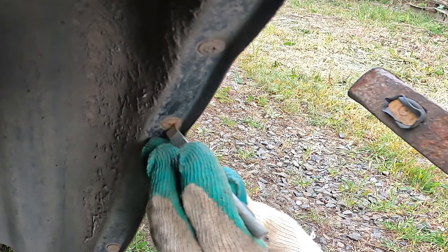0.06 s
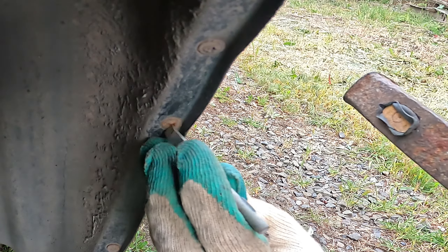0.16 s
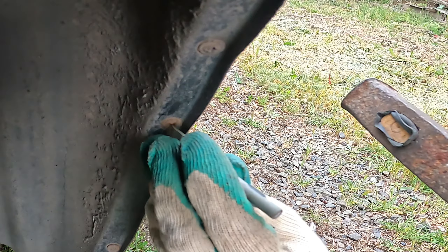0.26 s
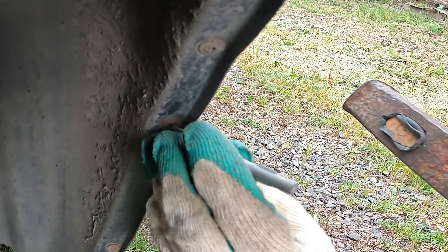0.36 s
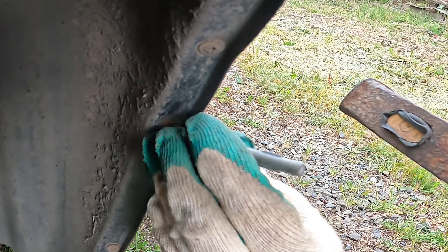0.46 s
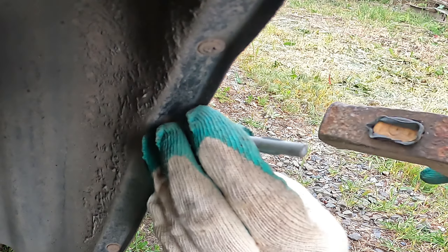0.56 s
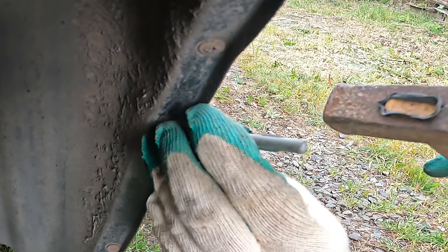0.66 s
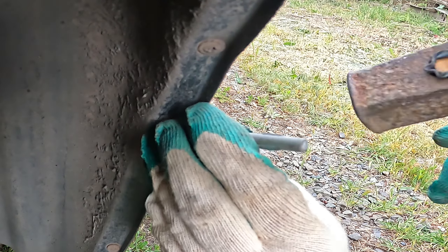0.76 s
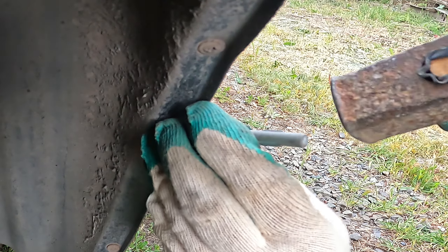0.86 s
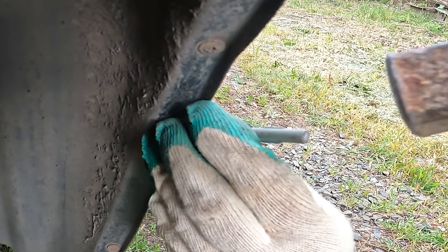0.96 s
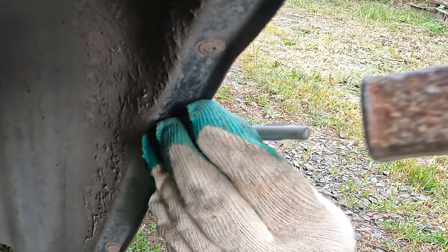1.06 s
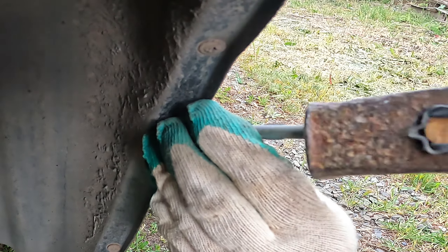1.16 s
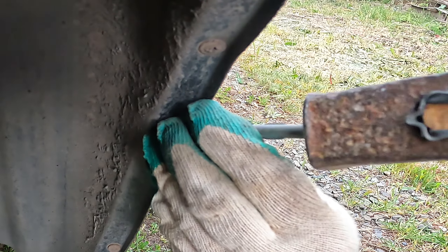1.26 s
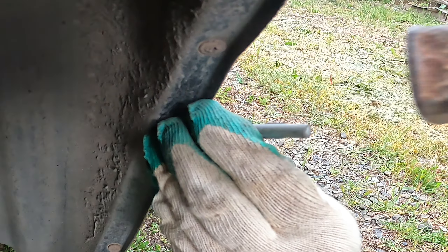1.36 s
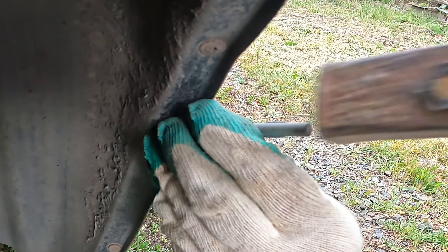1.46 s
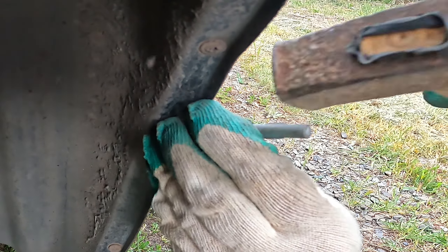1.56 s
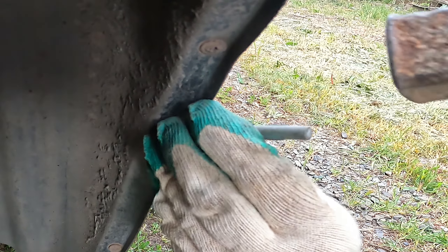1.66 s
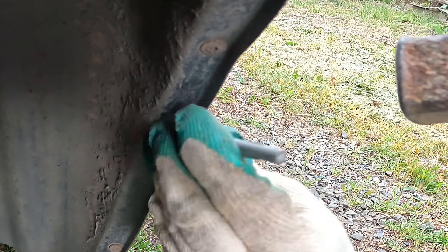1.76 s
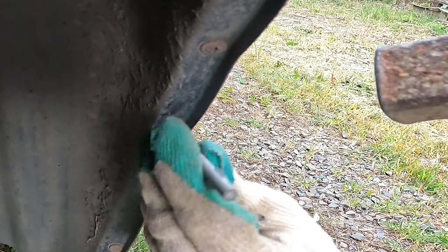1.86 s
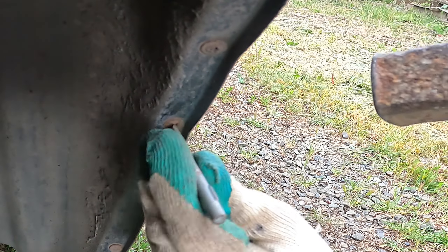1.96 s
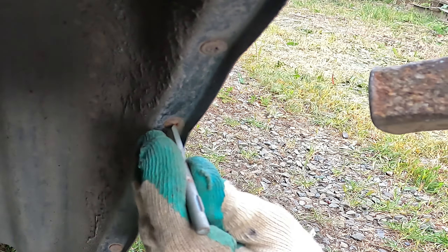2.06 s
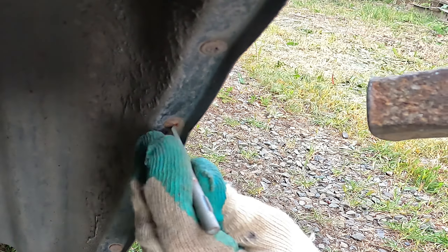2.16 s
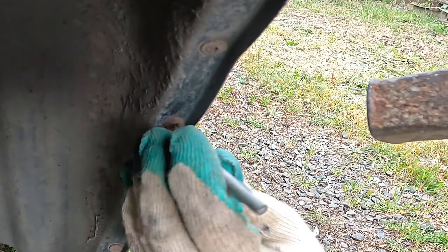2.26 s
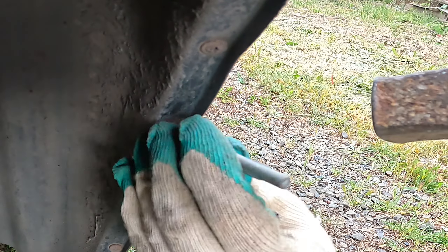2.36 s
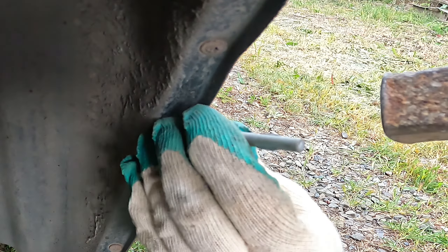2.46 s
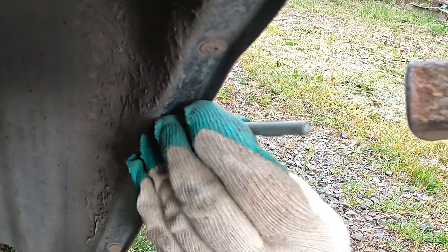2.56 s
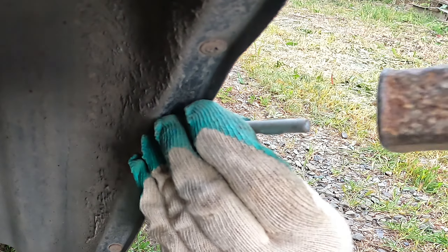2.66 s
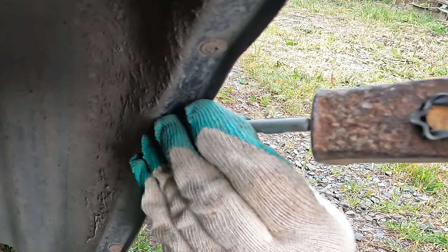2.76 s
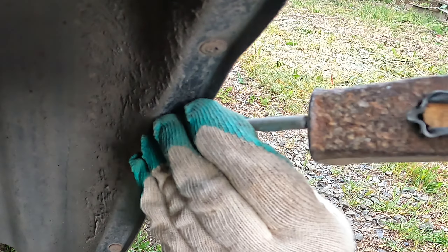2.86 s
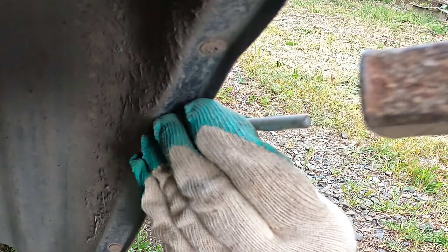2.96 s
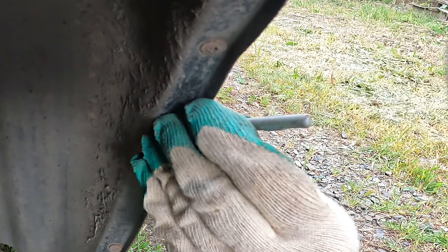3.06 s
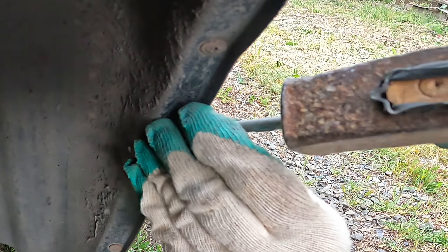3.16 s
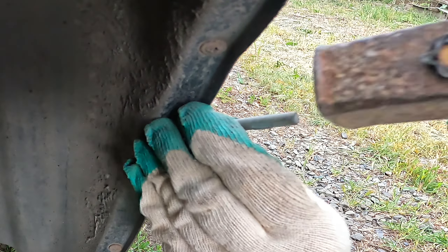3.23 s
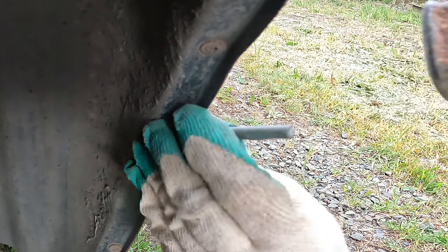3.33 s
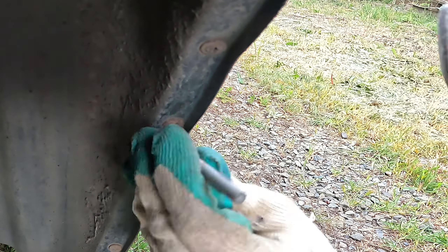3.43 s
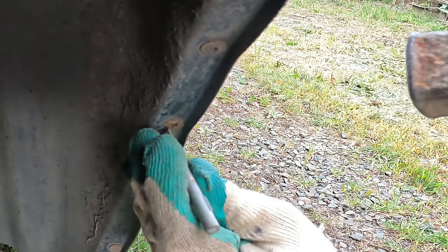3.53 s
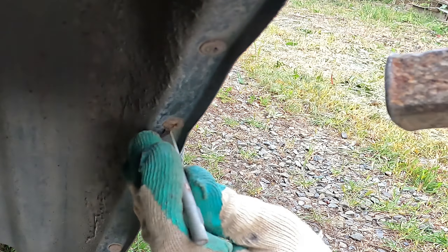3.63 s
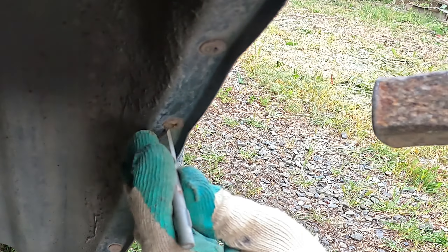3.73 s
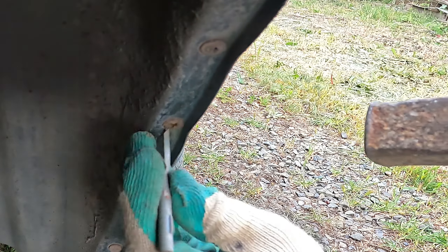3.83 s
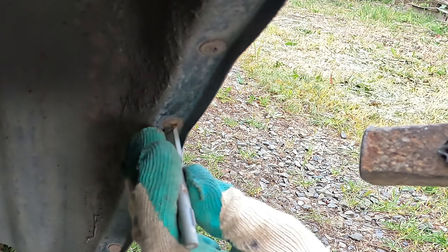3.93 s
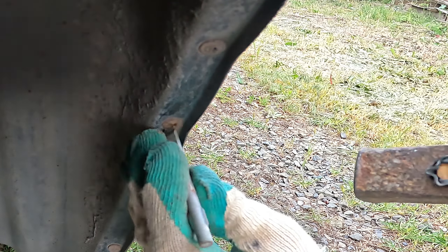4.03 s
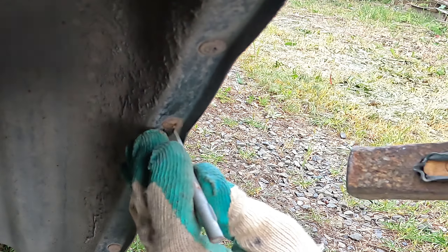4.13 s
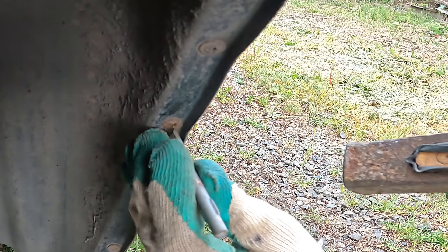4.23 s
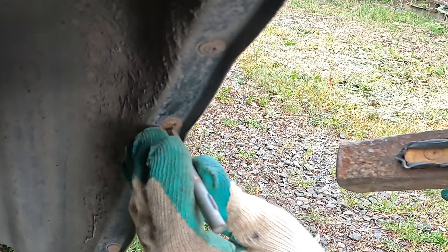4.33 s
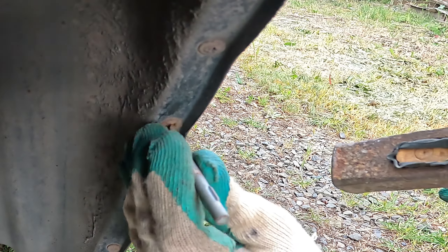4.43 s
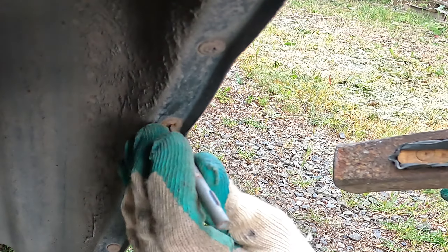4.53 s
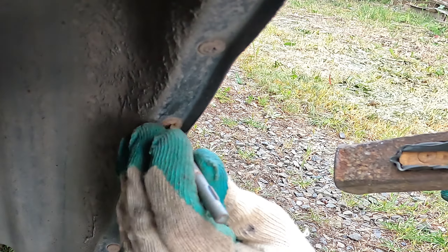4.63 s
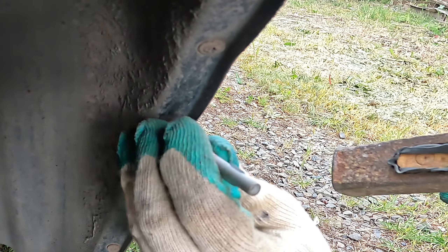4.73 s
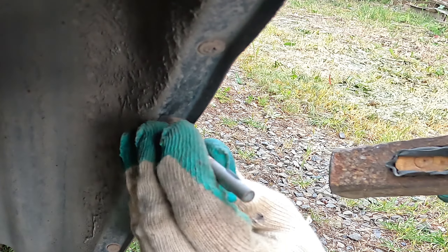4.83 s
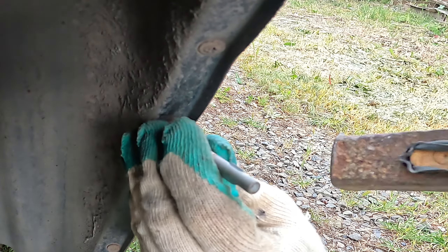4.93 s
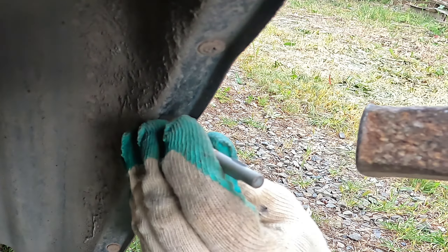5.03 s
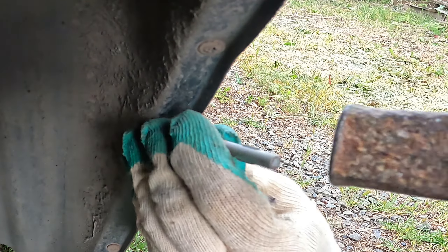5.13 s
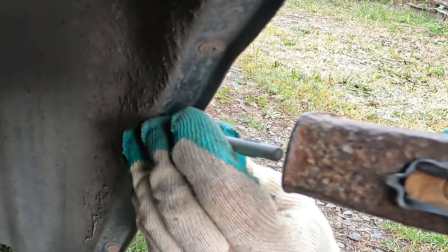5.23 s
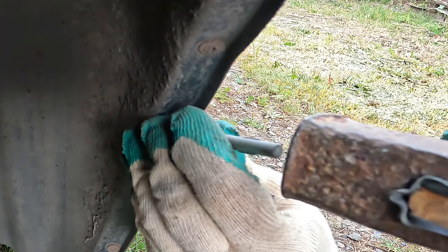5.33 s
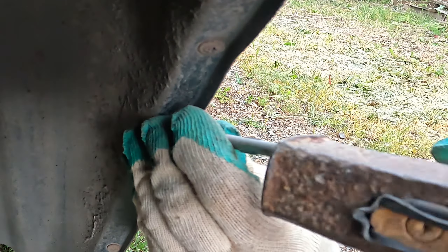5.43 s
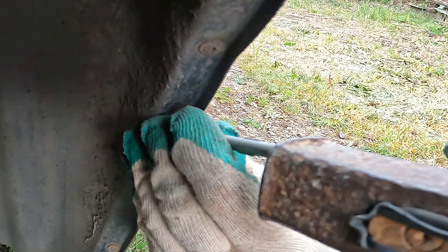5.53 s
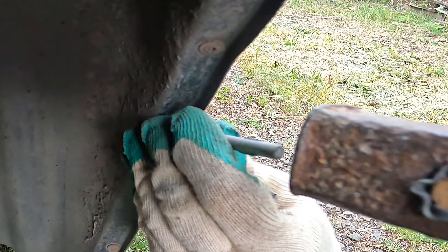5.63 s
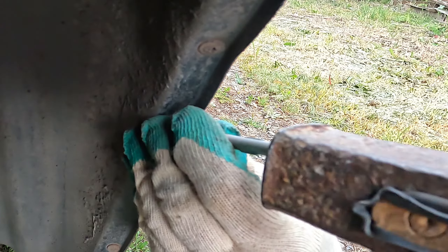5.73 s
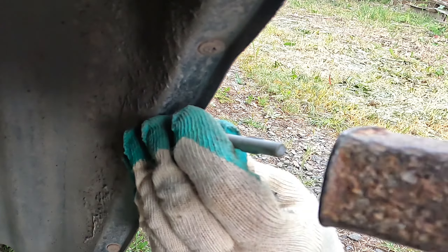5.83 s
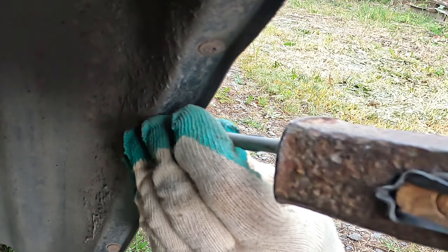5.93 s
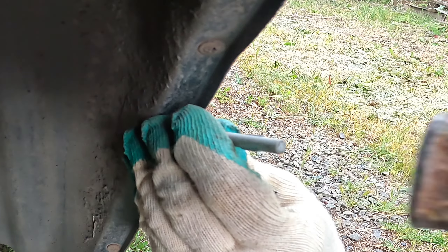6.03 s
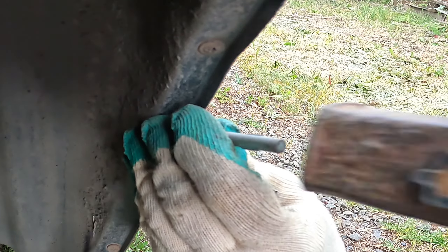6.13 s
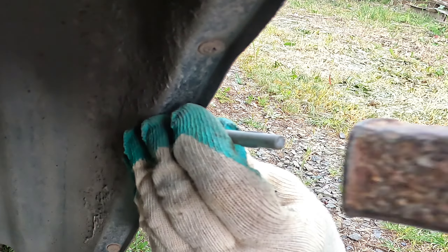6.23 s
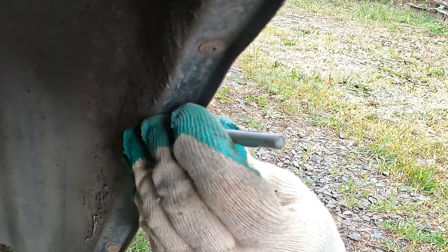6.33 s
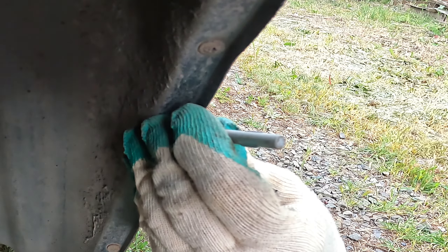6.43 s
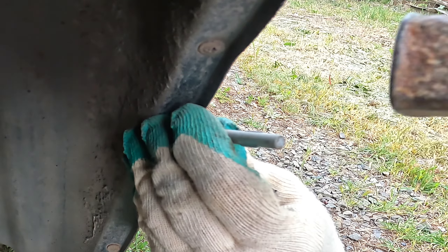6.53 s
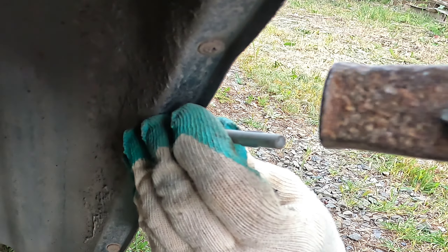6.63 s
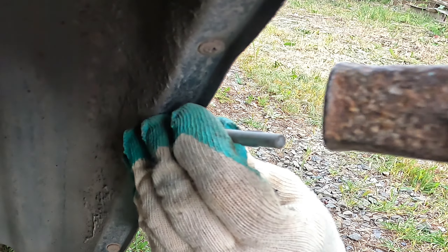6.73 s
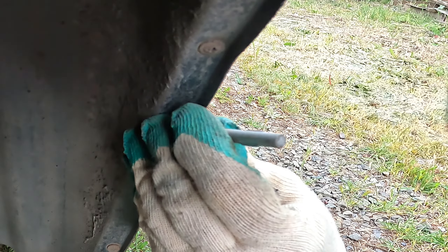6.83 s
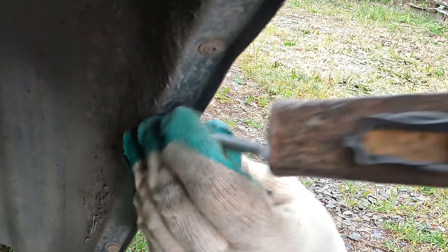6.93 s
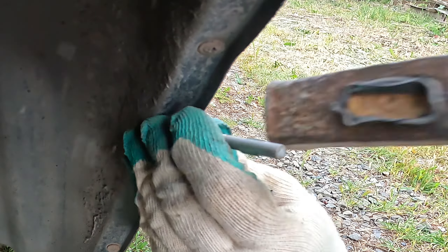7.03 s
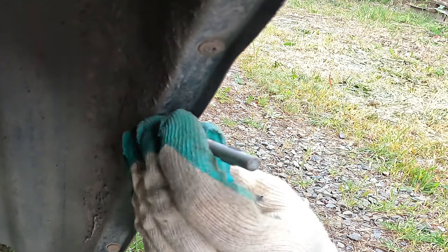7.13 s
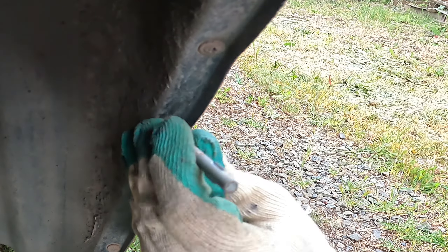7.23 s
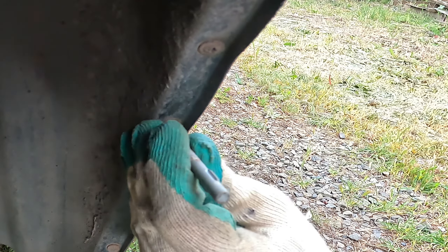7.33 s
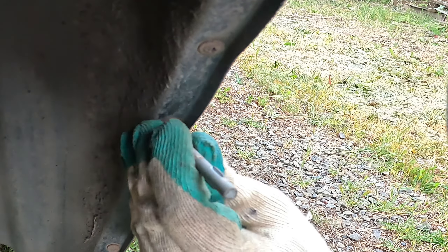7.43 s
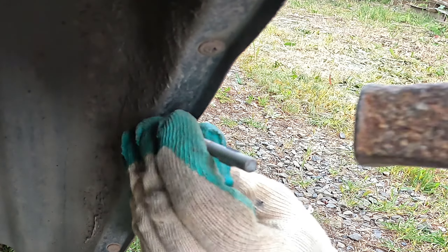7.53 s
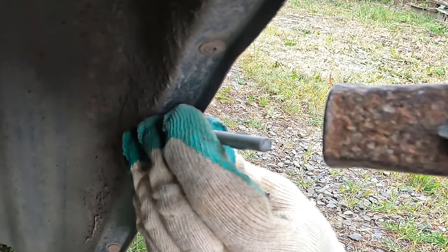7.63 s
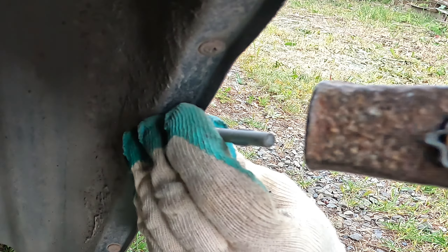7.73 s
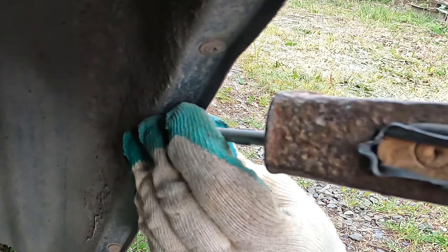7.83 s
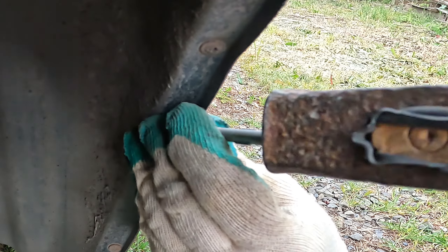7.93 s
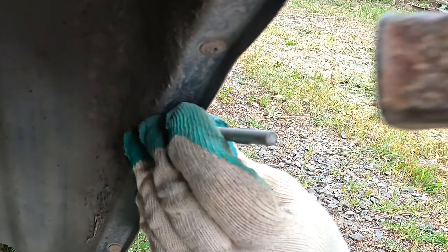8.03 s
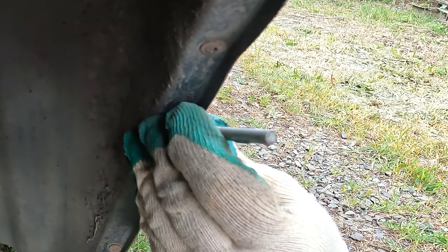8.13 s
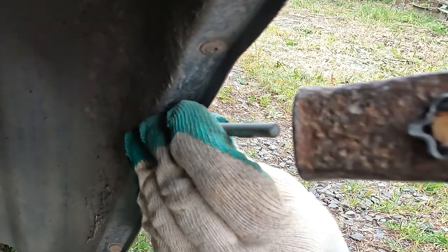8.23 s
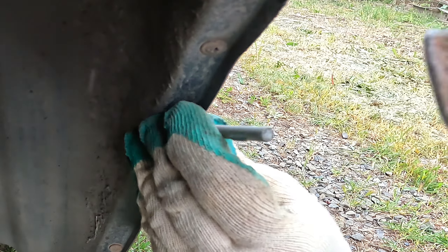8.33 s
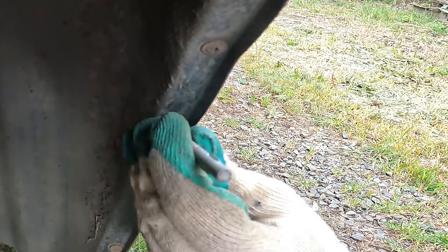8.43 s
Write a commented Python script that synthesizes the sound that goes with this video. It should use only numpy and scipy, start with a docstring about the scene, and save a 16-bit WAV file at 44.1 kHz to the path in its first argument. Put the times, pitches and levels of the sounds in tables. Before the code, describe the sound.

A hammer strikes a steel punch in sharp, irregular metallic knocks with a short sheet-metal boom, outdoors over a low wind rumble.

```python
"""Hammering a punch against a rusted screw

Outdoors, a hammer drives a steel punch against a screw in a sheet-steel panel. Each impact is a sharp
crack followed by a short boom of the panel's bending modes. Between blows the punch is reseated, clicking
and scraping in a gloved hand. Light wind rumbles at the microphone and a small bird chirps far off."""
import sys
import numpy as np
from scipy import signal
from scipy.fft import rfft, irfft
from scipy.io import wavfile
from scipy.ndimage import uniform_filter1d

SR = 44100
rng = np.random.default_rng(int(sys.argv[2]) if len(sys.argv) > 2 else 0)


def wrap_up_sound(samples):
    """Save the sound to the file named by the first command line argument, as 16-bit audio."""
    columns = np.atleast_2d(samples).T
    # keep every value between -1 and 1, then stretch to whole-number steps
    tamed = np.clip(columns, -1, 1)
    steps = np.round(tamed * 32767).astype(np.int16)
    wavfile.write(sys.argv[1], SR, steps)


N = 373968

# Blows and rebounds: t/s, force/dB, squareness of the hit/dB, tilt/(dB/octave), stutter level/dB,
# gain of the panel's middle modes/dB, ring-time factor left by the hand, treble cutoff/Hz
BLOW_EVENTS = [(1.2522, 0, -3, -2, -14.5, 0.5, 0.93, 13000), (1.301, -5.5, -8.5, -4, -59, -3, 1.46, 6150),
               (1.3283, -11, -5, -0.5, -51, 0, 1.21, 5000), (1.6, -0.5, 6.5, -1.5, -20, -2, 0.91, 14000),
               (2.8984, -3.5, 6, -2, -24, 2.5, 1.14, 11040), (2.923, -20.5, -6, -15, -46, 4.5, 0.97, 3977),
               (3.24, -0.5, 6.5, 0.5, -12.5, -2, 0.92, 15000),
               (3.275, -17.5, -18.5, 0.5, -46.5, -1.5, 1.2, 7950),
               (5.5546, -0.5, -6, -3.5, -13, 1.5, 1.08, 13000), (5.798, 0, -7, -2, -20.5, 0, 1.04, 12000),
               (6.024, -0.9, -4.5, -2.5, -29.5, 1.5, 1.04, 13000),
               (6.281, -1.17, -4.5, -1.5, -26, -0.5, 1.07, 12900),
               (7.0628, -0.5, 2.5, -0.5, -22, 1.5, 1, 17000),
               (7.9353, -3.5, -5.5, 3, -25.5, 0.5, 1.33, 9690), (7.978, -9, -5, -0.5, -43, 3.5, 1.36, 5900),
               (7.999, -11.5, -6.5, -2.5, -48, 2, 1.07, 4480), (8.3149, -0.5, -1, 2.5, -13, 1, 1.2, 17000)]
# Modes of the gripped punch: f/Hz, level/dB, T60/s
PUNCH_MODES = [(2480, -24.5, 0.008), (2863, -18.5, 0.023), (3220, -19.5, 0.032), (3940, -21, 0.0039),
               (3977, -22, 0.008), (4270, -19, 0.0037), (4564, -13.5, 0.017), (5430, -15, 0.009),
               (5720, -20, 0.011), (6400, -22.5, 0.011), (8000, -21, 0.016), (8300, -25, 0.006),
               (9660, -19, 0.0045)]
# Modes of the steel strap that passes the blow from screw to panel: f/Hz, level/dB, T60/s
STRAP_MODES = [(950, -5, .018), (1270, -12, .014)]
# Lightly damped modes of the whole frame: f/Hz, level/dB, T60/s
FRAME_MODES = [(39, -46.5, 3.5), (150, -57, 5.9), (233, -47, 3.1), (252, -47, 2.6)]
# Dense modes of the sheet: f/Hz, spectral level/dB; their decay: f/Hz, T60/s
RATTLE_SPECTRUM = [(100, -26), (250, 1.5), (600, 1), (1200, 2.5), (2000, -7), (5000, -8), (8000, -12.5),
                   (12000, -27), (16000, -40.5)]
RATTLE_DECAY = [(200, 0.25), (700, 0.089), (2000, 0.062), (5000, 0.031), (10000, 0.036)]
def hammer():
    """Impact excitation: hard blows crack more than they boom; square hits trade boom for clang."""
    out, t = np.zeros((2, N)), np.arange(SR // 2) / SR
    sheet = burst(RATTLE_SPECTRUM, RATTLE_DECAY, apart=1.0)  # the same modes answer every blow
    for s, force_db, square_db, tilt_db, stutter_db, middle_db, linger, cutoff_hz in BLOW_EVENTS:
        boom_db = force_db - 0.23 * square_db
        crack_db = 2.2 * force_db + 0.19 * square_db
        strap_db = 2.2 * force_db + 0.55 * square_db
        knock = amp(boom_db - 1.32) * panel_boom(square_db, middle_db, linger)
        clunk = ring(STRAP_MODES, SR // 10, scatter_db=-2.8, detune=0.04, cycles=0.7)
        ping = ring(PUNCH_MODES, SR // 10, scatter_db=3.5, detune=0.012)
        add(knock, 0, amp(strap_db) * clunk + amp(crack_db - 5) * ping)
        add(knock, 0, amp(crack_db - 7) * contact_crack(tilt_db))
        rattle = sheet + 1.5 * burst(RATTLE_SPECTRUM, RATTLE_DECAY, apart=0.25, tilt_db=tilt_db)
        rattle_db = (crack_db + boom_db) / 2 + 0.072 * square_db - 18
        knock += amp(rattle_db) * rattle * rise(t, 0.00016)
        knock = signal.lfilter(*signal.butter(3, cutoff_hz, fs=SR), knock)
        add(out, s, knock)
        add(out, s - 2 * STUTTER_S, amp(stutter_db) * stutter(knock))
        echo = signal.lfilter(*signal.butter(2, 330, fs=SR), knock)  # dull, from across the yard
        add(out, s + 0.16, amp(-28.5) * echo)
        add(out, s, amp(boom_db) * ring(FRAME_MODES, 2 * SR, scatter_db=2.5, detune=0.0015))
        add(out, s, amp(boom_db + square_db / 3 - 38.5) * yard_reverberation(t))
    return out


# Bending modes of the panel: f/Hz, level/dB, T60/s
PANEL_MODES = [(100, -18.5, 0.081), (138, -14.5, 0.16), (155, -25.5, 0.12), (167.5, -11, 0.2),
               (212.9, -1, 0.11), (252.3, -8, 0.11), (300.6, -21, 0.27), (329.2, -14.5, 0.15),
               (404.5, -15.5, 0.067), (507, -15.5, 0.07), (565, -18, 0.026), (625, -13, 0.04),
               (684, -19.5, 0.089), (743, -17, 0.09), (908, -23, 0.09), (977, -19.5, 0.11),
               (1055, -14, 0.036), (1158, -15, 0.046), (1320, -14.5, 0.042), (1390, -27, 0.033),
               (1565, -24.5, 0.082), (1710, -23, 0.04), (1924, -28, 0.05)]
def panel_boom(square_db, middle_db, linger):
    """Plate radiation: the bending modes sound freely, but an open sheet radiates little deep bass."""
    boom = ring(PANEL_MODES, SR // 2, scatter_db=1.28, detune=0.016, cycles=0.68,
                clang_db=square_db, middle_db=middle_db, linger=linger)
    return signal.lfilter(*signal.butter(2, 75, "high", fs=SR), boom)


# Contacts within one blow: nominal delay/s (played at about two thirds), level/dB
CHATTER_CONTACTS = [(0, 3.5), (.0022, -7.5), (.008, -23), (0.013, -25.5)]
# Steel striking steel: f/Hz, spectral level/dB
CRACK_SPECTRUM = [(300, -21), (1000, 2), (2200, -5), (3500, 0.5), (4800, 6.5), (7000, -4.5), (10000, -6),
                  (13000, -13.5), (16000, -24.5)]
def contact_crack(tilt_db):
    """A brief contact has a broad spectrum: the punch chatters in the screw in millisecond pulses."""
    out, t = np.zeros((2, SR // 2)), np.arange(SR // 10) / SR
    pulse = np.exp(-t / 0.0008) * rise(t, 0.00033)
    for delay, db in CHATTER_CONTACTS:
        crack = noise(CRACK_SPECTRUM, len(t), apart=0.23, tilt_db=tilt_db) * pulse
        add(out, delay * rng.uniform(0.66, 0.69), amp(db) * crack)
    return out


STUTTER_S = 0.0102  # length of each copy
def stutter(knock):
    """Pre-echo: two dull copies of a knock's onset swell into it."""
    band = signal.butter(2, [200, 5000], "band", fs=SR, output="sos")
    onset = signal.sosfilt(band, knock[:, :round(STUTTER_S * SR)])
    onset *= np.linspace(0.5, 1.4, onset.shape[1]) * signal.windows.tukey(onset.shape[1], 0.1)
    return np.hstack([amp(-10) * onset, onset])


# Diffuse field of the yard: f/Hz, spectral level/dB; its decay: f/Hz, T60/s
YARD_SPECTRUM = [(80, -19.5), (200, 10), (350, -11), (600, -22.5), (1100, -19.5), (2000, -27), (6000, -30),
                 (12000, -52.5), (16000, -58)]
YARD_DECAY = [(200, 0.97), (1000, 1), (3000, 0.43), (10000, 0.24)]
def yard_reverberation(t):
    """Reverberation: reflections build up, then die away, the treble first."""
    return burst(YARD_SPECTRUM, YARD_DECAY, apart=0.85) * rise(t, 0.01)


# The punch meets the screw: t/s, level/dB, tilt/(dB/octave), clink f/Hz
TOUCH_EVENTS = [(0.187, -36.5, -7.5, 1390), (0.2231, -28, -6, 1210), (0.264, -32, -3, 1130),
                (0.384, -46.5, 5.5, 3300), (0.431, -50.5, -5, 1660), (0.461, -49, -2.5, 1570),
                (1.489, -51.5, 2.5, 2300), (1.703, -49, 32, 8160), (1.879, -26.5, 2.5, 3070),
                (2.068, -37.5, 1.5, 2750), (2.2795, -49.5, 0.5, 3800), (2.2847, -34.5, -5.5, 1260),
                (2.52, -40, -3.5, 1970), (3.372, -47.5, 11, 3843), (3.588, -51, -51.5, 875),
                (3.656, -45, -8.5, 1488), (4.183, -49, -10.5, 840), (4.465, -38.5, -2, 1685),
                (4.483, -28, 0, 1550), (4.541, -24.5, 2.5, 1120), (4.572, -28.5, -8.5, 231),
                (6.116, -51, 9.5, 1247), (6.525, -52, 4.5, 1013), (7.009, -50, 5, 1037),
                (7.401, -52.5, 14, 2866), (7.651, -54.5, 4.5, 1880)]
# A light contact: f/Hz, spectral level/dB; its decay: f/Hz, T60/s
TOUCH_SPECTRUM = [(100, -1), (300, 1), (800, -2), (1300, 2.5), (2000, -1.5), (3200, -3), (4500, -5.5),
                  (6000, -5.5), (9000, -14.5), (13000, -24), (16000, -39)]
TOUCH_DECAY = [(300, 0.1), (1300, 0.084), (3000, 0.047), (6000, 0.015), (12000, 0.03)]
# Bite of the tip, common to all touches: f/Hz, gain/dB
TIP_BITE = [(900, -6.5), (2600, -6), (7000, -11)]
def punch_touches():
    """Light impacts excite the bending modes of a rod; each grip gives another brightness and clink."""
    out, t = np.zeros((2, N)), np.arange(SR // 2) / SR
    hz = np.geomspace(100, 16000, 200)
    octaves = np.log2(np.clip(hz, 900, 7000) / 2600)
    for s, db, tilt_db, clink_hz in TOUCH_EVENTS:
        clink = 7 * bell(hz, clink_hz, octaves=0.26)
        clink -= 2.5 * bell(hz, 2.76 * clink_hz, octaves=0.26)  # slight dip at the second bending mode
        spectrum = read(TOUCH_SPECTRUM, hz) + read(TIP_BITE, hz) + tilt_db * octaves + clink
        touch = burst(np.c_[hz, spectrum], TOUCH_DECAY, apart=0.46)
        add(out, s, amp(db + 5) * rise(t, 0.00012) * touch)
    return out


# Drags of the tip: t/s, duration/s, level/dB
SCRAPE_STROKES = [(.17, 0.08, -39.5), (2.275, 0.035, -56), (4.455, 0.051, -38), (4.555, 0.019, -31)]
# Grinding rust: f/Hz, spectral level/dB
GRIT_SPECTRUM = [(150, -12), (400, 5), (1300, 13.5), (2100, 12.5), (3200, -5), (4200, -18), (6000, -1.5),
                 (8000, -61), (14000, -47)]
def rust_scrapes():
    """Friction on a rough surface: rust grinds under the tip as it seeks the screw head."""
    return noise(GRIT_SPECTRUM, N, apart=0.94) * strokes(SCRAPE_STROKES, grain_db=3.5, grain_samples=130)


# Shifts of the grip: t/s, duration/s, level/dB
GRIP_STROKES = [(1.3, 1.52, -58.5), (3.35, 1, -60.5), (5.6, 1.56, -60.5), (7.15, 0.82, -58)]
# Slides over the steel: t/s, duration/s, level/dB, rasp f/Hz
RUB_STROKES = [(0, 0.057, -58.5, 3000), (0.267, 0.14, -56, 3100), (0.427, 0.19, -56.5, 2870),
               (0.543, 0.27, -55, 5800), (0.77, 0.23, -52.5, 3000), (0.859, 0.085, -51, 4560),
               (0.969, 0.12, -57.5, 5630), (1.697, 0.64, -65, 4400), (2.193, 0.31, -70.5, 3460),
               (3.356, 0.3, -68, 5000), (4.718, 0.17, -55.5, 3000), (4.97, 0.05, -60, 8570),
               (7.296, 0.28, -70.5, 4960)]
# Knit fabric on steel: f/Hz, spectral level/dB
GLOVE_SPECTRUM = [(300, -22.5), (950, -0.5), (2100, 5.5), (2900, 0.5), (4200, -5), (7200, -5),
                  (8500, -13.5), (13000, -15), (15000, -29.5)]
def glove():
    """Sliding friction: the knit rasps; rust crumbs tick and threads scuff as the grip shifts."""
    crumbs = uniform_filter1d(catches(per_s=76, floor_db=-7, decay_s=0.0015), size=50)
    scuffs = uniform_filter1d(catches(per_s=9, floor_db=-9, decay_s=0.009), size=300)
    out = noise(GLOVE_SPECTRUM, N, apart=0.66) * (crumbs + scuffs)
    out *= strokes(GRIP_STROKES, grain_db=-3.5, grain_samples=200)
    hz = np.geomspace(300, 15000, 60)
    for s, duration, db, rasp_hz in RUB_STROKES:
        size = round(duration * SR)
        spectrum = read(GLOVE_SPECTRUM, hz) + 7 * bell(hz, rasp_hz, octaves=0.28)
        envelope = signal.windows.tukey(size, 0.7) * grain(size, depth_db=2.5, samples=300)
        add(out, s, amp(db) * envelope * noise(np.c_[hz, spectrum], SR, apart=0.81)[:, :size])
    return out


# Threads snag and rust flakes snap under the fingers: t/s, level/dB, centre f/Hz
SNAG_EVENTS = [(1.44, -49.5, 2950), (1.7674, -50, 4460), (1.8023, -53, 6900), (1.924, -42.5, 3100),
               (1.9844, -41, 2960), (2.4659, -46.5, 3000), (3.3604, -49, 7000), (3.445, -45, 4450),
               (3.5323, -46, 5440), (3.6896, -49.5, 2940), (5.361, -52.5, 7860), (5.953, -50, 7700),
               (5.976, -45, 3040), (6.616, -50, 5200), (6.6596, -55, 5960), (6.6997, -53.5, 4000),
               (6.8032, -54.5, 4996), (6.963, -50.5, 2150), (7.5056, -54, 3400), (7.6256, -52.5, 4020),
               (7.7404, -55.5, 5480)]
def snags():
    """Sudden release of tension: a band-limited snap, then a rustle as neighbouring threads let go."""
    out, t, hz = np.zeros((2, N)), np.arange(SR // 20) / SR, np.geomspace(200, 16000, 40)
    width_octaves, snap_decay_s, rustle_peak_s = 1.03, 0.0015, 0.0041
    snap = np.exp(-t / snap_decay_s)
    swell = t / rustle_peak_s * np.exp(1 - t / rustle_peak_s)
    for s, db, centre_hz in SNAG_EVENTS:
        band_db = -10 * np.log10(1 + (2 * np.log2(hz / centre_hz) / width_octaves) ** 4)
        rustle = amp(-7) * swell * grain(len(t), depth_db=9, samples=80)
        add(out, s, amp(db - 5) * noise(np.c_[hz, band_db], len(t), apart=0.82) * (snap + rustle))
    return out


# Course of the wind: t/s, level/dB; its rumble: f/Hz, spectral level/dB
WIND_LEVEL = [(0.0, -41.5), (1.2, -42.5), (1.7, -49), (2.53, -51), (2.81, -45.5), (3.19, -45),
              (3.54, -51.5), (3.8, -52.5), (4.2, -49), (5.48, -43), (5.62, -49.5), (6.28, -50),
              (6.5, -57.5), (7.41, -58), (7.93, -51), (8.48, -57.5)]
WIND_SPECTRUM = [(15, -7), (35, 0), (60, 2.5), (95, 3), (130, -6.5), (200, -15), (270, -16.5), (360, -35),
                 (600, -44), (2000, -95)]
# Course of the yard's faint hiss: t/s, level/dB; its colour: f/Hz, spectral level/dB
HISS_LEVEL = [(0, 3), (2.7, 1.5), (3.1, -6), (3.55, 1.5), (4.3, -2.5), (4.9, 4.5), (5.5, -1), (6.4, -2),
              (6.85, -3.5), (7.4, -1), (7.85, -2), (8.2, -8), (8.48, 5.5)]
HISS_SPECTRUM = [(180, -33), (300, -9), (467, -24), (606, -14), (828, -18), (1170, -14), (2170, -26),
                 (7180, -30.5), (12300, -40.5), (15000, -64)]
def wind_and_hiss():
    """Turbulence at the microphone makes a lumpy rumble; a faint hiss comes and goes above it."""
    t = np.arange(N) / SR
    lumps_db = 2.5 * wander(N, samples=round(0.088 * SR))
    gust = amp(np.interp(t, *np.transpose(WIND_LEVEL)) + lumps_db + 3)
    hiss = amp(np.interp(t, *np.transpose(HISS_LEVEL)) - 67) * grain(N, depth_db=1.5, samples=2500)
    rumble = gust * noise(WIND_SPECTRUM, N, apart=0.15, from_panel=False)
    return rumble + hiss * noise(HISS_SPECTRUM, N, apart=0.58, from_panel=False)


# Calls: t/s, level/dB, pitch factor
CHIRP_EVENTS = [(2.667, -67.5, 0.96), (3.966, -64.5, 0.97), (5.103, -54, 1)]
# Contour of one call: t/s, f/Hz, level/dB
CHIRP_CONTOUR = [(0, 4900, -16), (.01, 3750, -9), (.022, 3650, 0), (.032, 3620, -3), (.042, 3150, -16),
                 (.055, 3000, -11), (.07, 3350, -4), (.079, 3850, 1), (.088, 4100, -14)]
def bird():
    """Frequency modulation: a thin whistle drops, holds, dips and flicks up; trees scatter it back."""
    path_s, path_hz, path_db = np.transpose(CHIRP_CONTOUR)
    out, t = np.zeros((2, N)), np.arange(0, path_s[-1], 1 / SR)
    envelope = amp(np.interp(t, path_s, path_db)) * signal.windows.tukey(len(t), 0.1)
    echo_age = np.arange(SR // 2) / SR / 0.035  # the scatter peaks after 35 ms
    for s, db, pitch in CHIRP_EVENTS:
        hz = pitch * np.interp(t, path_s, path_hz) * (1 + 0.03 * wander(len(t), samples=40))
        call = np.sin(2 * np.pi * np.cumsum(hz) / SR) * envelope
        echoes = 0.048 * rng.standard_normal((2, len(echo_age))) * echo_age * np.exp(-echo_age)
        blurred = call * wander(len(t), samples=45)  # moving leaves smear the pitch
        add(out, s, amp(db) * call[None])
        add(out, s, amp(db) * signal.fftconvolve(blurred[None], echoes, axes=1))
    return out


def ring(modes, size, scatter_db, detune, clang_db=0, cycles=0.58, middle_db=0, linger=1):
    """Modal superposition: damped sinusoids, each building up with a time constant given in cycles."""
    out = np.zeros((2, size))
    for k, (hz, db, t60) in enumerate(modes):
        lag_s = 0.0008 * np.clip(np.log2(600 / hz), 0, 1)  # long bending waves travel slowly
        t = np.maximum(np.arange(size) / SR - lag_s, 0)
        level = db + clang_db * bell(hz, 930, octaves=0.71) + middle_db * bell(hz, 370, octaves=0.55)
        level += scatter_db * rng.standard_normal()
        pitch = hz * (1 + detune * rng.standard_normal())
        # low neighbours swing in opposite senses; higher phases depend on the spot struck
        phase = np.pi * k + (hz / 657.6) ** 2 * rng.standard_normal()
        damping = np.log(1000) / (t60 * linger)
        swing = np.exp((2j * np.pi * pitch - damping) * t + 1j * phase) * rise(t, cycles / hz)
        out += amp(level) * (stereo_gain(hz)[:, None] * swing).imag
    return out


def burst(spectrum, decay, apart, tilt_db=0):
    """Modal overlap: close modes struck at once merge into noise, each band dying at its own rate."""
    t, hz = np.arange(SR // 2) / SR, np.fft.rfftfreq(SR // 2, 1 / SR)
    bins = rfft(noise(spectrum, len(t), apart, tilt_db))
    centres, t60s = np.transpose(decay)
    bands = [irfft(bins * read(np.c_[centres, weights], hz), len(t)) for weights in np.eye(len(t60s))]
    return sum(band * amp(-60 * t / t60) for band, t60 in zip(bands, t60s))


def noise(spectrum, size, apart, tilt_db=0, from_panel=True):
    """Partly coherent stereo noise of unit RMS; apart weights what the channels do not share."""
    hz = np.fft.rfftfreq(size, 1 / SR)
    white = rfft(rng.standard_normal((3, size)))
    shared = white[0] * (stereo_gain(hz) if from_panel else 1)
    gain = amp(read(spectrum, hz) + tilt_db * np.log2((hz + 1) / 4000))
    return unit_rms(irfft((shared + apart * white[1:]) * gain, size))


# Left channel relative to right: f/Hz, level difference/dB; and f/Hz, phase lead/rad
LEVEL_DIFFERENCE = [(90, .4), (160, 1.8), (250, 1), (330, 1.8), (400, -4), (560, 6), (750, 1.5), (860, -7),
                    (970, 5), (1500, 1), (2400, 4.5), (4600, -3.3), (9000, 0), (13000, 2)]
PHASE_LEAD = [(90, .1), (140, -.1), (260, -.2), (330, .1), (390, .65), (470, -.9), (560, -1), (640, -.2),
              (740, -.9), (900, -1.3), (980, .45), (1300, -.85), (3000, -.75), (9000, -.2)]
def stereo_gain(hz):
    """Transfer function from the panel to the two microphone ports."""
    left = amp(read(LEVEL_DIFFERENCE, hz) / 2) * np.exp(1j * read(PHASE_LEAD, hz) / 2)
    return np.array([left, 1 / left])


def strokes(rows, grain_db, grain_samples):
    """Envelope of sliding contact: each stroke swells and fades, catching on grains."""
    level = np.zeros((1, N))
    for s, duration, db in rows:
        add(level, s, amp(db) * signal.windows.tukey(round(duration * SR), 0.7)[None])
    return level * grain(N, grain_db, grain_samples)


def catches(per_s, floor_db, decay_s):
    """Poisson process: an envelope of small catches of random size, each decaying exponentially."""
    onsets = rng.random(N) < per_s / SR
    sizes = amp(floor_db + 4.5 * np.minimum(rng.exponential(1, N), 3))
    return signal.lfilter([1], [1, -np.exp(-1 / (decay_s * SR))], onsets * sizes)


def grain(size, depth_db, samples):
    """Log-normal modulation: an uneven level whose grains are the given number of samples long."""
    roughness = uniform_filter1d(rng.standard_normal(N), size=samples)[:size]
    return unit_rms(amp(depth_db * unit_rms(roughness)))


def wander(size, samples):
    """Random fluctuation of unit RMS: a moving average of white noise."""
    return unit_rms(uniform_filter1d(rng.standard_normal(size), size=samples))


def bell(hz, centre_hz, octaves):
    """Gaussian peak on a log-frequency axis."""
    return np.exp(-(np.log2(hz / centre_hz) / octaves) ** 2)


def read(points, hz):
    """Interpolation on a log-frequency axis."""
    f, value = np.transpose(points)
    return np.interp(np.log(hz + 1), np.log(f), value)


def rise(t, tau_s):
    return 1 - np.exp(-t / tau_s)


def amp(db):
    return 10 ** (np.asarray(db) / 20)


def unit_rms(x):
    return x / np.sqrt(np.mean(x ** 2) + 1e-20)


def add(mix, s, sound):
    part = mix[:, round(s * SR):][:, :sound.shape[1]]
    part += sound[:, :part.shape[1]]


# Threshold of the noise suppressor: f/Hz, spectral density level/dB
HUSH_THRESHOLD = [(250, -125), (600, -108), (1200, -107), (3000, -117), (6000, -119), (12000, -128)]
def suppress(x):
    """Downward expansion: bands near or below the threshold are turned down, by 11 dB at most."""
    frames = dict(fs=SR, nperseg=512, noverlap=384, scaling="psd")
    hz, _, bins = signal.stft(x, **frames)
    power = uniform_filter1d((abs(bins) ** 2).mean(0), size=7, axis=0)  # smoothed over frequency
    power = abs(uniform_filter1d(power, size=5, axis=1))  # and over time
    threshold = amp(read(HUSH_THRESHOLD, hz))[:, None] ** 2
    gain = np.maximum(power / (power + threshold), amp(-11))
    return signal.istft(bins * gain, **frames)[1][:, :N]


def scene():
    """Linear superposition of the sources."""
    return hammer() + punch_touches() + rust_scrapes() + glove() + snags() + wind_and_hiss() + bird()


def record(dry):
    """Expansion hushes the pauses, saturation rounds the peaks, and low-pass filters limit the band."""
    quiet = suppress(dry)
    rounded = quiet / (1 + quiet ** 8) ** (1 / 8)
    softened = signal.lfilter(*signal.butter(2, 13000, fs=SR), rounded)
    band_limit = signal.firwin(511, 16300, window=("kaiser", 9), fs=SR)
    return signal.oaconvolve(softened, band_limit[None], "same")


dry = scene()
out = record(dry)
wrap_up_sound(out)
```